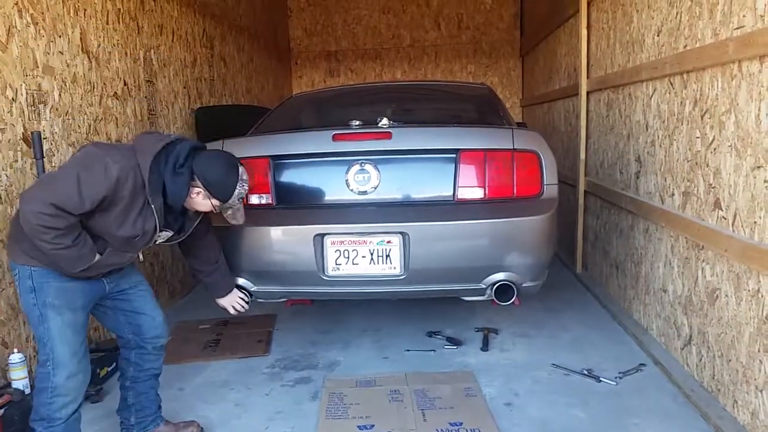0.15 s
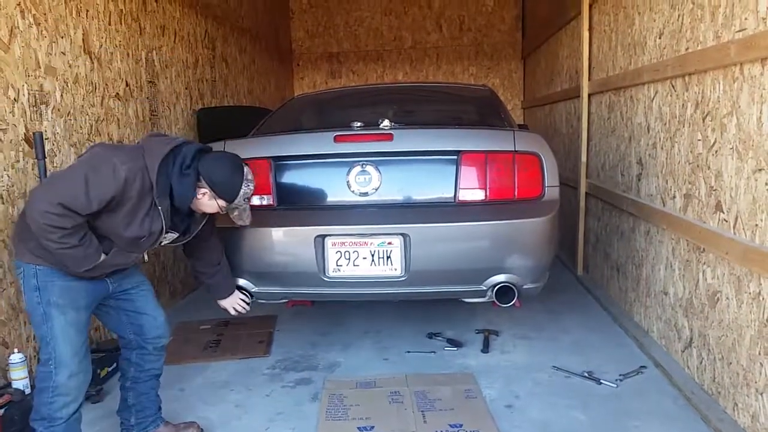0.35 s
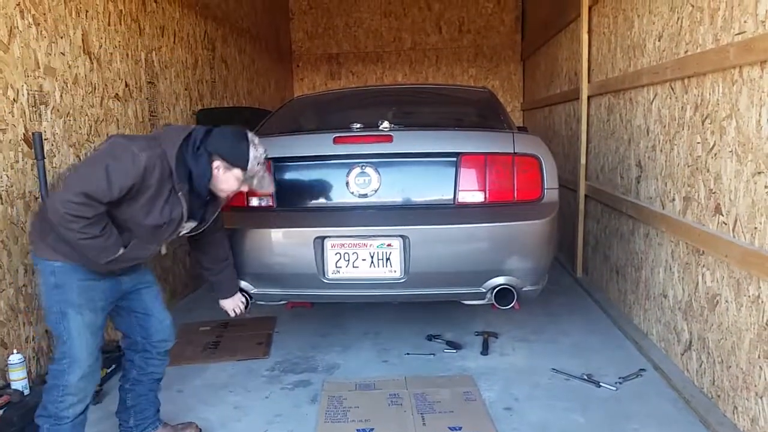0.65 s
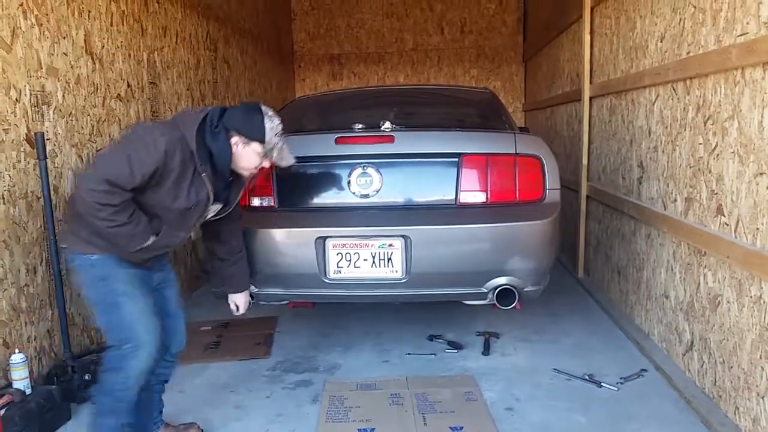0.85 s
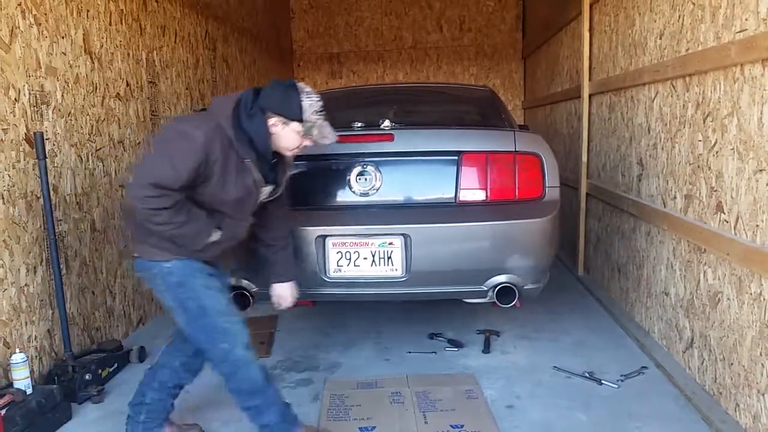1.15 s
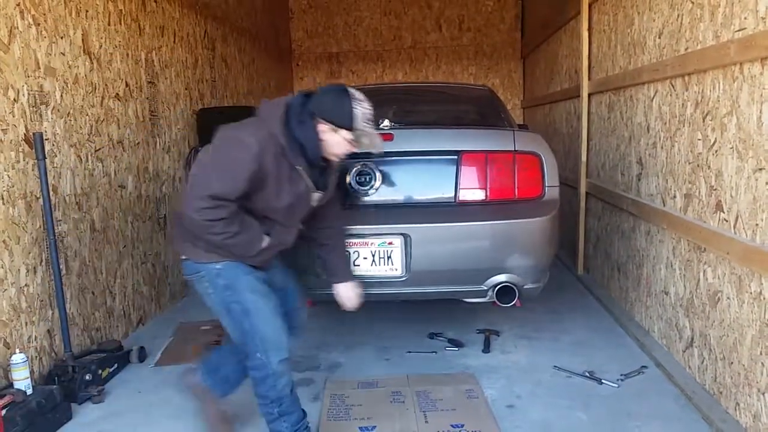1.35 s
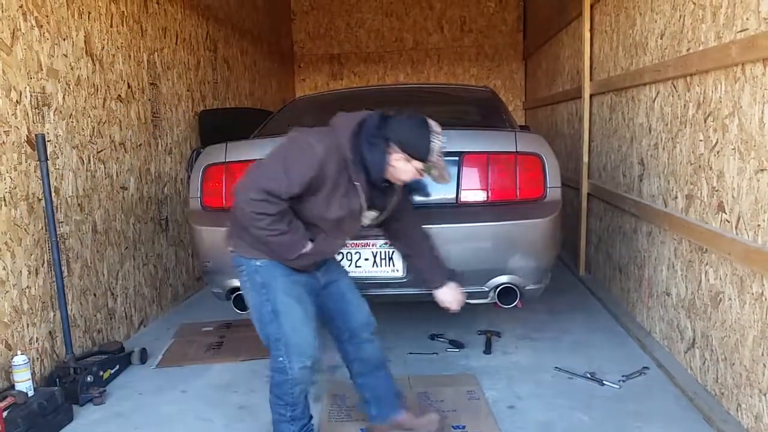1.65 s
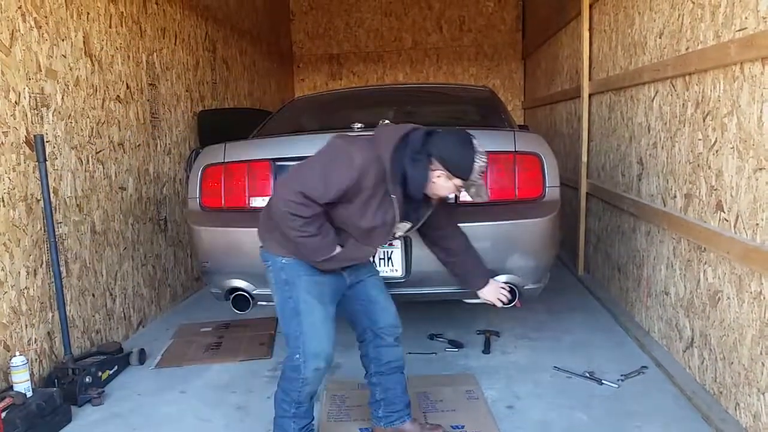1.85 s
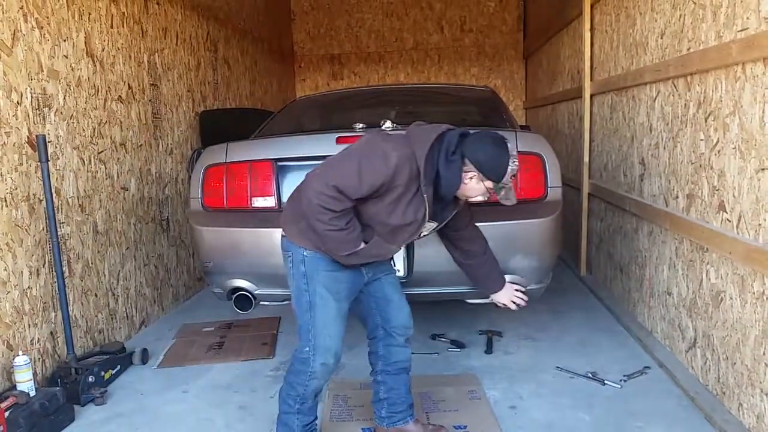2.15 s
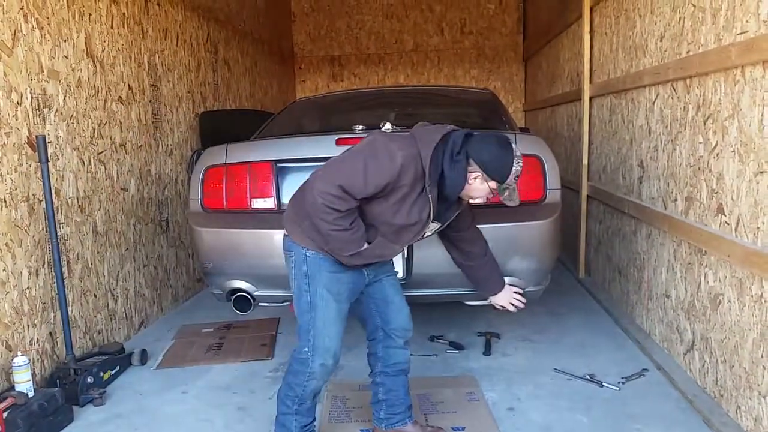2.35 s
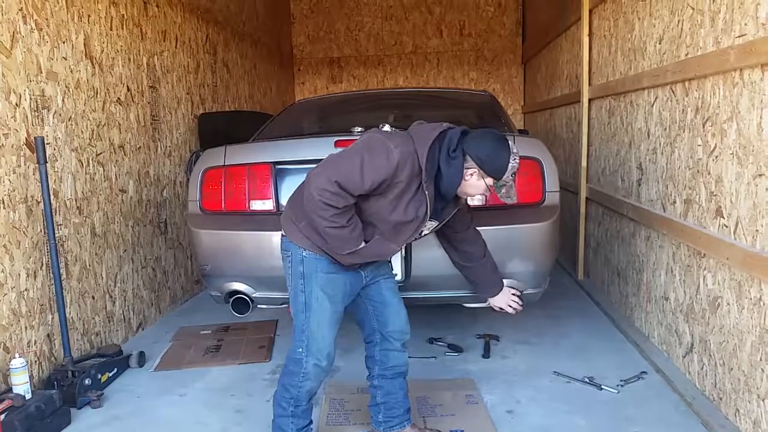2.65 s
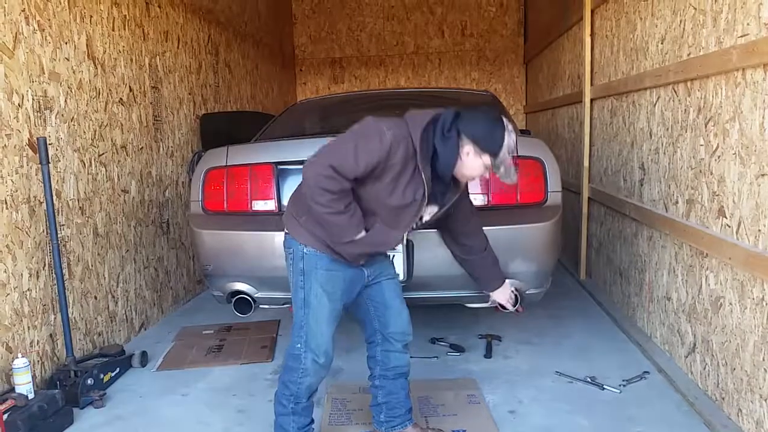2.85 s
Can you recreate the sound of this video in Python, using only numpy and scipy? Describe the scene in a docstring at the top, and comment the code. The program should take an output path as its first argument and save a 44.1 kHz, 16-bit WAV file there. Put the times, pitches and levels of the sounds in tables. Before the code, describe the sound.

A V8 car engine idles from the start to the end at about 3 seconds, heard from behind the car in a small wooden shed. The exhaust gives a deep, throbbing boom with raspy puffs, its speed barely wavering, turning slightly raspier from around 2 seconds. Throughout, further back and to the left, valves tick lightly, a metal panel rings faintly and the engine gives a thin hiss.

```python
"""A cross-plane V8 idling in a small wooden shed, on a stereo microphone pair behind the car.
Two unevenly firing banks boom through the exhaust; each firing adds a raspy puff of gas.
Further back and towards the left microphone, the valve gear ticks, a metal panel rings
once a cycle and the engine hisses faintly."""
import sys
import numpy as np
from scipy import signal
from scipy.fft import rfft, irfft
from scipy.io import wavfile
from scipy.ndimage import uniform_filter1d, minimum_filter1d

SR = 44100
rng = np.random.default_rng(int(sys.argv[2]) if len(sys.argv) > 2 else 0)


def file_out(sig):
    """Save sig as 16-bit WAV at sys.argv[1]."""
    # one column per channel
    cols = np.atleast_2d(sig).T
    # limit, then scale
    lim = np.clip(cols, -1, 1)
    pcm = np.round(lim * 32767).astype(np.int16)
    wavfile.write(sys.argv[1], SR, pcm)


N = 132300

# idle speed (time [s], speed [rpm])
IDLE_RPM = [(0.0, 1373.1), (0.2, 1372.1), (0.75, 1385.5), (1.0, 1401.4), (1.35, 1392.0), (1.68, 1372.0),
            (2.0, 1390.4), (2.25, 1394.6), (2.45, 1408.0), (2.75, 1396.7), (3.0, 1387.2)]
# cylinders in firing order, setting the boom's phases (early arrival [s], strength [dB])
FIRING_PULSES = [(-0.0004, -6.2), (0.0011, -3.7), (0.007, -2.3), (-0.0, 1.6), (0.0082, -3.2),
                 (0.0074, -4.9), (0.0008, 1.6), (0.0069, -10.6)]
# pipe and silencer resonances that delay each pulse (centre [Hz], width [Hz])
PIPE_MODES = [(70, 10), (83.1, 8.1), (120.5, 125), (203, 149), (368.4, 135)]
# engine orders: multiples of the cycle rate, from the second up (base level [dB])
ORDER_LEVELS = [-54, -60, -38, -21, -26, -28, -15.5, -53, -22.5, -26.5, -23.5, -28, -27, -20.5, -31, -43,
                -35.5, -31.5, -23.5, -42, -36.5, -38, -25, -53, -38, -37.5, -57, -29, -39, -41.5, -21.5,
                -51.5, -45.5, -49.5, -41.5, -42, -43.5, -41.5, -49, -45.5, -52, -54.5, -56, -44.5, -49, -58,
                -53, -50.5, -47.5, -48, -43, -50.5, -58.5, -57, -77, -56.5, -51, -46, -44, -44.5, -46.5,
                -60, -56.5, -54, -45, -49.5, -52.5, -47.5, -42, -52, -46.5, -55.5, -51, -52, -58, -59, -59,
                -58.5]
# borders between deep boom, middle boom and upper drone, then the drone's top (frequency [Hz])
REGISTER_EDGES = [110, 210, 430]
# slow swells; orders above the drone follow the rasp
# (time [s], deep boom [dB], middle boom [dB], drone [dB], rasp [dB], ticks [dB], hiss [dB])
SWELLS = [(0, 1.4, -2.6, 0.6, -1, -1.5, 0.5), (.65, 0.1, -1, .8, -1, -0.5, -2.5),
          (.95, -1.5, 1.3, -1.5, 0.8, 0.6, -0.5), (1.3, -1, 0.8, .7, 1, 0.5, -.5),
          (1.7, 1.3, -1.6, .3, -2.5, -1, -2.5), (2.05, -1, 0, -0.5, 2.1, 0, 1.5),
          (2.5, -1, 2, -2, 1.5, -.7, 1), (3, -1, 1.6, -0.5, 2.6, -0.9, 1.4)]
# gas puffs at the tailpipes (place in the cycle [0-1], relative level [dB])
GAS_PUFFS = [(.015, -3.5), (.185, -1.5), (.31, 0), (.39, -3.5), (.515, -13.5), (.705, -3.5), (.835, 3),
             (.92, -6)]
# base spectrum of the puffs (frequency [Hz], level [dB/Hz])
RASP_SPECTRUM = [(20, -70), (45, -47), (130, -47.5), (250, -55), (400, -58.5), (500, -63.5), (620, -59.5),
                 (830, -61), (980, -66.5), (1080, -67), (1250, -83), (2000, -98.5)]
# exhaust at the microphones (frequency [Hz], left minus right [dB], left lead [rad])
EXHAUST_IMAGE = [(60, 1.5, 0.16), (110, 0.7, 0.32), (200, 1, .42), (380, 1.5, 0.56), (700, 2.5, 1.05),
                 (1300, 5.5, 1.14)]
# valve ticks (place in the cycle [0-1], relative level [dB])
VALVE_TICKS = [(.045, -6), (.17, -6.5), (.305, -2.5), (.425, -0.5), (.545, -2), (.66, -1.5), (.805, 2.5),
               (.915, -2.5)]
# base spectrum of the ticks (frequency [Hz], left [dB/Hz], right [dB/Hz])
TICK_SPECTRUM = [(700, -68, -86), (1280, -79.5, -81.5), (1550, -69, -75.5), (2030, -75.5, -80.5),
                 (2327, -66, -72.5), (2744, -70.5, -79.5), (3120, -74, -86), (3520, -65.5, -82.5),
                 (4020, -68.5, -91), (4450, -65.5, -97), (5240, -69, -100), (6550, -80, -100),
                 (8500, -93.5, -102), (15000, -105, -105)]
# modes of the engine's covers (centre [Hz], width [Hz], added gain [dB])
COVER_MODES = [(2310, 26, 2), (2503, 50, -0.5), (2788, 23, 5.5), (4525, 90, 1)]
# base spectrum of the hiss (frequency [Hz], left [dB/Hz], right [dB/Hz])
HISS_SPECTRUM = [(5970, -100, -106), (8450, -93, -100), (10030, -85, -89), (11800, -73.5, -87),
                 (13000, -75, -85), (14200, -86.5, -87), (15700, -96, -90)]


def exhaust_boom(t, cycle, cycle_hz, first_firing=.925, diffuse_hz=400):
    """Engine orders, timed by the firing pattern, delayed by the pipes and smeared by the shed."""
    early_s, strength_db = np.array(FIRING_PULSES).T
    firings = first_firing + np.arange(len(early_s)) / len(early_s) - early_s * cycle_hz
    boom = 0
    for order, base_db in enumerate(ORDER_LEVELS, 2):
        f = order * cycle_hz
        pulses = np.sum(amp(strength_db) * np.exp(-2j * np.pi * order * firings))
        pipes = np.prod([resonance(f, hz, width) for hz, width in PIPE_MODES])
        phase = np.angle(pulses * pipes)
        phase += (f > diffuse_hz) * rng.uniform(0, 2 * np.pi)  # wall reflections scramble high orders
        looseness = (f / 480) ** 1.33  # higher orders drift more
        tone = np.cos(2 * np.pi * order * cycle + phase + looseness * .25 * drift(9))
        swell_db = curve(SWELLS, t, column=1 + np.searchsorted(REGISTER_EDGES, f))
        wander_db = looseness * 1.4 * drift(7.006)
        boom = boom + amp(base_db + swell_db + wander_db) * tone
    return np.sqrt(2) * boom * amp(.2 * drift(92))  # scatter from firing to firing


def tailpipe_rasp(t, cycle, f):
    """A turbulent puff of gas follows each firing."""
    envelope = bursts(cycle, GAS_PUFFS, attack_cycles=.015, decay_cycles=.057, scatter_db=.6, floor=.32)
    puffs = rng.standard_normal(N) * envelope
    return irfft(rfft(puffs) * colour(RASP_SPECTRUM, f), N) * amp(curve(SWELLS, t, column=4))


def exhaust_at_microphones(exhaust, f):
    """The exhaust reaches the left microphone a little earlier and louder than the right."""
    balance_db, lead_rad = curve(EXHAUST_IMAGE, f, column=1), curve(EXHAUST_IMAGE, f, column=2)
    left = amp(balance_db / 2) * np.exp(.5j * lead_rad)
    return irfft(rfft(exhaust) * np.array([left, 1 / left]), N)


def valve_gear(t, cycle, f):
    """Valve ticks ring the covers and scatter off the walls, louder at the left microphone."""
    envelope = bursts(cycle, VALVE_TICKS, attack_cycles=.035, decay_cycles=.08,
                      scatter_db=1.44, floor=.37)
    ticks = rng.standard_normal((2, N)) * envelope
    covers = 1 + sum(amp(db) * resonance(f, hz, width) for hz, width, db in COVER_MODES)
    sides = np.array([colour(TICK_SPECTRUM, f, column) for column in (1, 2)])
    return irfft(rfft(ticks) * covers * sides, N) * amp(curve(SWELLS, t, column=5))


def panel_ring(t, cycle, ring_hz=1377, place=.52, left_db=-47, right_db=-57):
    """Off to the left, a metal panel is shaken once a cycle and rings unsteadily."""
    shake = bursts(cycle, [(place, 0)], attack_cycles=.14, decay_cycles=.23, scatter_db=2.5, floor=.15)
    ring = unit_rms(shake * np.sin(2 * np.pi * ring_hz * t + .89 * drift(70)))
    return ring * amp([[left_db], [right_db]])


def engine_hiss(t, cycle, f, peak_place=.69, pulse_db=2, flutter_db=1.8):
    """In the background, a thin hiss swells once a cycle and flutters."""
    db = curve(SWELLS, t, column=6) + pulse_db * np.cos(2 * np.pi * (cycle - peak_place))
    db += flutter_db * drift(300)
    sides = np.array([colour(HISS_SPECTRUM, f, column) for column in (1, 2)])
    return irfft(rfft(rng.standard_normal((2, N))) * sides, N) * amp(db)


def bursts(cycle, blows, attack_cycles, decay_cycles, scatter_db, floor):
    """Envelope (rms 1) of blows that recur each engine cycle, each time with a new strength."""
    power = floor ** 2
    for place, db in blows:
        count, age = np.divmod(cycle - place + 2, 1)
        strength = amp(db + scatter_db * rng.standard_normal(64))[count.astype(int)]
        blow = strength * np.minimum(age / attack_cycles, 1) * np.exp(-age / decay_cycles)
        power = power + blow ** 2
    return unit_rms(np.sqrt(power))


def drift(rate_hz):
    """Smooth random drift with a spread near 1."""
    hold = max(int(SR / rate_hz), 1)
    steps = np.repeat(rng.standard_normal(N // hold + 1), hold)
    return 1.41 * uniform_filter1d(uniform_filter1d(steps, hold), hold)[:N]


def resonance(f, hz, width):
    """Band-pass response, gain 1 at the centre."""
    return 1j * f * width / (hz ** 2 - f ** 2 + 1j * f * width)


def colour(table, f, column=1):
    """Gain that gives unit white noise the table's spectrum."""
    rows = np.array(table, float)
    return amp(np.interp(np.log(f + 1), np.log(rows[:, 0]), rows[:, column])) * np.sqrt(SR / 2)


def curve(table, at, column=1):
    """One column of a table, joined by straight lines."""
    rows = np.array(table, float)
    return np.interp(at, rows[:, 0], rows[:, column])


def amp(db):
    """Decibels to gain."""
    return 10 ** (np.asarray(db) / 20)


def unit_rms(x):
    """Scale to rms 1."""
    return x / np.sqrt(np.mean(x ** 2))


def scene():
    """The shed from behind the car. Engine speed drives every source."""
    t, f = np.arange(N) / SR, np.arange(N // 2 + 1) * SR / N
    cycle_hz = curve(IDLE_RPM, t) / 120  # one cycle is two turns of the crank
    cycle = np.cumsum(cycle_hz) / SR
    exhaust = exhaust_boom(t, cycle, cycle_hz.mean()) + tailpipe_rasp(t, cycle, f)
    return (exhaust_at_microphones(exhaust, f) + valve_gear(t, cycle, f)
            + panel_ring(t, cycle) + engine_hiss(t, cycle, f))


def record(dry, ceiling=.9, top_hz=15600):
    """After the microphones, a limiter holds down the biggest pulses and the top is cut."""
    allowed_gain = np.minimum(1, ceiling / np.abs(dry).max(axis=0))
    held_gain = minimum_filter1d(allowed_gain, size=400)
    gain = uniform_filter1d(uniform_filter1d(held_gain, size=200), size=200)
    lowpass = signal.ellip(10, .1, 80, top_hz, fs=SR, output="sos")
    return signal.sosfilt(lowpass, dry * gain)


dry = scene()
out = record(dry)
file_out(out)
```